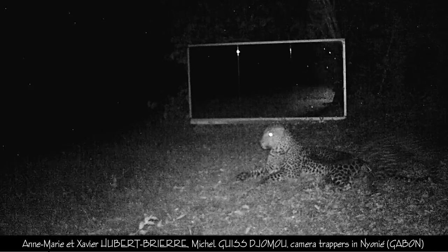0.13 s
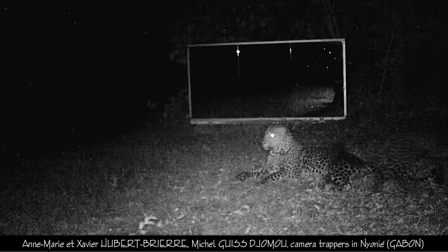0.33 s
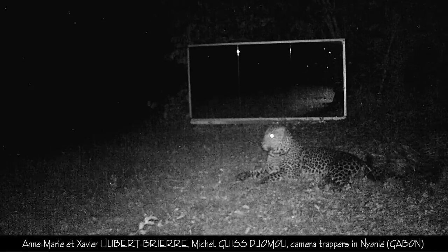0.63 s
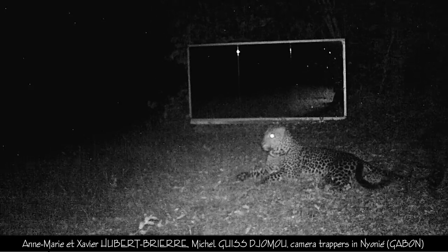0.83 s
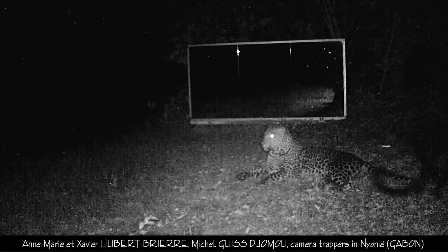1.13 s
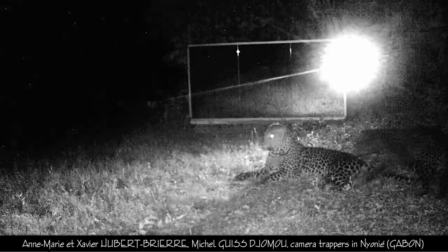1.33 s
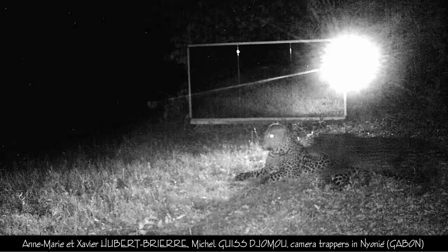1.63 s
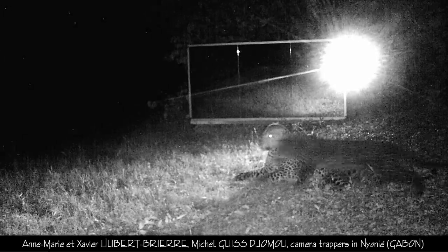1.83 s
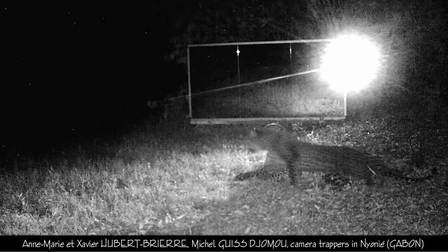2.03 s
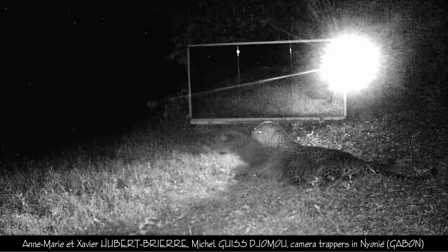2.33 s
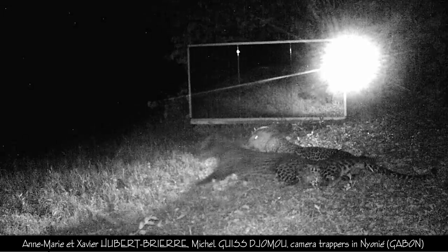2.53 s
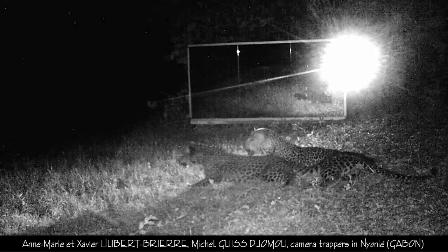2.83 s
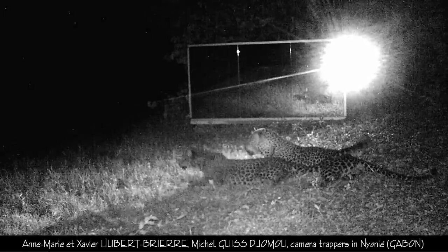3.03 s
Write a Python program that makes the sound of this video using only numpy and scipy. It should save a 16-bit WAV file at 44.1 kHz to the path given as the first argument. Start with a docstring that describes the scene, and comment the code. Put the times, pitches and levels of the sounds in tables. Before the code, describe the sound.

Leopard growls pulse low and rattly, faint until 0.7 s, more open from 0.8 to 1.35, then deep and swelling from 1.5 to 2.2. A rasping snarl bursts around 2.45, followed by a protesting growl and hard jaw snap at 2.7, then a quiet rumble after 2.9. Twigs crack near 0.3, 1.2 and 1.8 amid leaf rustles. Crickets shimmer throughout; the small camera sounds grainy, faintly doubled.

```python
"""Forest at night: two leopards meet among singing insects, paws stirring dry leaves and snapping twigs.
Slow throat pulses ring mouth and throat resonances: growls alternate deep and more open, break into a
rasping snarl and a snap of the jaws, then sink back. Insects are dense random ticks in narrow bands.
A small trail camera doubles everything faintly and, by its low sample rate, mirrors the insects into the treble."""
import sys
import numpy as np
from scipy import signal
from scipy.fft import rfft, irfft, next_fast_len
from scipy.io import wavfile
from scipy.ndimage import uniform_filter1d

SR = 44100
rng = np.random.default_rng(int(sys.argv[2]) if len(sys.argv) > 2 else 0)


def unload_wav(signal):
    """Save mono or channel-first audio to the path in sys.argv[1] as 16-bit WAV at rate SR, clipped to [-1, 1]."""
    wavfile.write(
        sys.argv[1],
        SR,
        np.round(np.clip(np.atleast_2d(signal).T, -1, 1) * 32767).astype(np.int16),
    )


N = 141120


def amp(db):
    """Decibels to gain."""
    return 10 ** (np.asarray(db) / 20)


def unit(x):
    """Scale to rms 1."""
    return x / np.sqrt(np.mean(x ** 2) + 1e-20)


def clock():
    """Time of every sample, in s."""
    return np.arange(N) / SR


def curves(rows):
    """Straight-line curve over time for each column after the first."""
    time_s, *columns = np.transpose(rows)
    return [np.interp(clock(), time_s, column) for column in columns]


def bump(centre_s, half_s):
    """Gaussian rise and fall; half_s is its standard deviation."""
    return np.exp(-.5 * ((clock() - centre_s) / half_s) ** 2)


def filtered(x, response):
    """x times a (complex) response of frequency, zero-padded."""
    m = next_fast_len(N + SR // 2)
    return irfft(rfft(x, m) * response(np.fft.rfftfreq(m, 1 / SR)), m)[:N]


def coloured(x, points):
    """x shaped by (freq_hz, level_db) points on a log frequency axis, at rms 1."""
    freq_hz, level_db = np.transpose(points)
    return unit(filtered(x, lambda f: amp(np.interp(np.log(f + 1), np.log(freq_hz), level_db))))


def causal(gain):
    """Minimum-phase response with this gain, by folding the cepstrum."""
    c = irfft(np.log(gain + 1e-6))
    half = len(c) // 2
    folded = np.r_[c[0], 2 * c[1:half], c[half], np.zeros(half - 1)]
    return np.exp(rfft(folded))


def ticks(rate_per_s):
    """Single-sample impulses of random size at random times."""
    hits = rng.random(N) < rate_per_s / SR
    return hits * rng.standard_normal(N)


# night air and microphone floor: freq_hz, level_db (relative)
AIR_TONE = [(15, 7.5), (55, -7.5), (100, -5), (300, -16), (600, -20.5), (1000, -21), (1400, -16),
            (1700, -19.5), (2800, -9.5), (3600, -27), (5500, -29)]
AIR_DB = -43.5


def night_air():
    """Steady shaped noise."""
    return amp(AIR_DB) * coloured(rng.standard_normal(N), AIR_TONE)


# cricket chorus level: time_s, level_db
CHORUS = [(0, -30), (.5, -28), (.63, -33), (.76, -30.5), (1.42, -30.5), (1.66, -27.5), (1.77, -32.5),
          (1.95, -28), (2.17, -26.5), (2.27, -31), (2.4, -27.5), (2.65, -26), (2.83, -25), (2.95, -32),
          (3.2, -32.5)]
# cricket chorus spectrum: freq_hz, level_db (relative)
CHORUS_TONE = [(1650, -47), (2020, -32), (2130, -14), (2260, -10), (2370, 0), (2480, -7), (2570, -17),
               (2700, -49), (3100, -46)]
# swells of the higher crickets: centre_s, half_s, level_db
SWELLS = [(0.165, 0.053, -31), (0.263, 0.059, -41.5), (0.495, 0.049, -34), (0.779, 0.039, -29.5),
          (0.998, 0.037, -33.5), (1.268, 0.041, -31), (2.057, 0.035, -32), (2.402, 0.048, -29.5),
          (2.589, 0.04, -28.5), (2.803, 0.062, -35), (2.914, 0.023, -38), (3.104, 0.064, -39)]
# higher cricket spectrum: freq_hz, level_db (relative)
SWELL_TONE = [(2400, -63), (2650, -13), (2810, -6), (2920, 3), (3000, -8.5), (3080, -9), (3220, -26),
              (3500, -68)]
# thin buzz level: time_s, level_db
BUZZ = [(0, -88), (.45, -58.5), (.65, -43), (1, -35), (1.25, -43), (1.5, -39.5), (1.7, -46.5),
        (2.95, -68.5), (3.2, -43.5)]
# thin buzz spectrum: freq_hz, level_db (relative)
BUZZ_TONE = [(3500, -62), (4400, -16.5), (4900, -5), (5500, -4.5)]
SWELL_REST_DB = -40.5
STROKES_PER_S = 6000


def insects():
    """Countless overlapping wing strokes in two pitch bands, a thin buzz above them."""
    chorus = amp(curves(CHORUS)[0]) * coloured(ticks(STROKES_PER_S), CHORUS_TONE)
    swell = amp(SWELL_REST_DB) + sum(amp(db) * bump(s, half_s) for s, half_s, db in SWELLS)
    higher = swell * coloured(ticks(STROKES_PER_S), SWELL_TONE)
    buzz = amp(curves(BUZZ)[0]) * coloured(ticks(4000), BUZZ_TONE)
    return chorus + higher + buzz


JITTER_CYCLES = 0.0509  # scatter of the throat pulses
SKIRT, LEAK_DB = 2.45, -29.5  # steepness of the resonances; what passes between them
BRIGHT_HZ, BRIGHT_DB_PER_DB = 626, 0.24  # above BRIGHT_HZ, extra dB per dB of effort


def throat_source(rows, rough, burst_s, air_db):
    """Slaps of the vocal folds, each releasing a dying puff of turbulence, over steady breath."""
    t, start_s, end_s = clock(), rows[0][0], rows[-1][0]
    rate_per_s, level_db = curves(rows)
    voiced = (t >= start_s) & (t < end_s)
    cycles = np.cumsum(rate_per_s * voiced) / SR
    whole = np.arange(cycles[-1])
    scattered = whole + JITTER_CYCLES * rng.standard_normal(256)[:len(whole)]
    at = np.searchsorted(cycles, np.clip(scattered, 1e-9, cycles[-1]))
    slaps = np.zeros(N)
    # even power at any rate; each slap varies by about 1 dB
    slaps[at] = np.sqrt(SR / rate_per_s[at]) * amp(rng.standard_normal(256)[:len(at)])
    puff = np.exp(-t[:SR // 8] / burst_s)
    puffs = signal.fftconvolve(slaps, puff / np.linalg.norm(puff))[:N]
    breath = amp(air_db) * uniform_filter1d(voiced * 1., size=600)
    share = np.clip(rough, 0, 1)
    turbulence = (np.sqrt(share) * puffs + breath) * rng.standard_normal(N)
    return amp(level_db) * (np.sqrt(1 - share) * slaps + turbulence), level_db


def growl(rows, throat, rough, burst_s, air_db, bright=BRIGHT_DB_PER_DB):
    """Slaps and turbulence ring the throat, brighter with more effort."""
    source, level_db = throat_source(rows, rough, burst_s, air_db)

    def tract(f):
        """Resonances in parallel, at rms gain 1."""
        peaks = sum(amp(db) / (1 + abs(2 * (f - hz) / width_hz) ** SKIRT) for hz, width_hz, db in throat)
        leak = amp(LEAK_DB) / (1 + (f / BRIGHT_HZ) ** 2)
        return causal(unit(peaks + leak))

    voice = filtered(source, tract)
    low = filtered(voice, lambda f: 1 / (1 + (f / BRIGHT_HZ) ** 8))
    return low + (voice - low) * amp(bright * (level_db - level_db.max()))


# lips part and close in the deep growls: time_s, resonance_hz, boost_db
MOUTH = [(1.54, 438, 9), (1.65, 706, 13.5), (1.77, 700, 15.5), (1.85, 697, -5), (2.95, 735, 27),
         (3.1, 480, 8.5)]
MOUTH_WIDTH_HZ = 47


def mouth(x):
    """Moving resonance of the parted lips: shift to 0 Hz, one-pole smooth, shift back."""
    resonance_hz, boost_db = curves(MOUTH)
    turn = np.exp(2j * np.pi * np.cumsum(resonance_hz) / SR)
    pole = np.exp(-np.pi * MOUTH_WIDTH_HZ / SR)
    smoothed = signal.lfilter([1 - pole], [1, -pole], x / turn)
    return amp(boost_db) * 2 * np.real(turn * smoothed)


# growls: time_s, pulses_per_s, level_db
FADING = [(.018, 24, -44), (.07, 20, -44), (.14, 13.7, -60.5), (.25, 19, -50), (.66, 19.2, -56.5)]
WARNING = [(.826, 27.3, -38.5), (.95, 20, -37.5), (1.12, 23, -33), (1.2, 19, -33.5), (1.352, 18.1, -41)]
APPROACH = [(1.475, 24.76, -44), (1.639, 24.66, -30.5), (1.719, 27.12, -34), (1.792, 24.81, -31.5),
            (1.839, 32.91, -36), (1.95, 35.08, -32), (2.05, 29.97, -34.5), (2.189, 29.76, -27.5),
            (2.235, 27.9, -41)]
SNARL = [(2.317, 55.32, -29.5), (2.355, 52.4, -26.5), (2.4, 47.95, -26.5), (2.437, 49.55, -15),
         (2.465, 46.65, -19), (2.522, 44.4, -22.5), (2.545, 43.1, -29.5), (2.6, 42.04, -32.5)]
PROTEST = [(2.574, 45.86, -31), (2.598, 27.04, -26.5), (2.67, 25.02, -31), (2.735, 34, -26.5),
           (2.78, 23.8, -30), (2.82, 23.6, -37)]
SETTLING = [(2.928, 36.4, -41.5), (3.016, 33.13, -38.5), (3.074, 34.94, -37.5), (3.2, 27.76, -43)]
# throat and mouth resonances: freq_hz, width_hz, level_db (relative)
DEEP = [(98.8, 140, -17), (203, 63.4, 0.5), (510, 290, -37.5), (1883, 115, -15.5)]
OPEN = [(109, 140, -10), (211.6, 51, -5.5), (378, 79, 0), (879, 143, -21), (1863, 174, -18.5)]
TENSE = [(122, 62, -2.5), (203.7, 61, 7), (374, 90, 0.5), (875, 43, -10.5), (1110, 2800, -24),
         (2010, 150, -4)]
BARED = [(219, 98, 2.5), (553, 200, -14.5), (1014, 206, -5.5), (1302, 440, -12), (1788, 60, 3),
         (1892, 86, 2), (2236, 300, 4.5), (3960, 1950, -24)]
# gapes in the open growls, lifting their upper resonance: centre_s, half_s, boost_db
YAWNS = [(1.094, 0.091, 13), (2.737, 0.021, 13.5)]
YAWN_HZ, YAWN_WIDTH_HZ = 891, 154


def leopards():
    """Deep growls alternate with open ones; the snarl is a coarse rattle of hissing puffs."""
    deep = sum(growl(rows, DEEP, rough=.2, burst_s=.008, air_db=-7) for rows in (FADING, APPROACH, SETTLING))
    warning = growl(WARNING, OPEN, rough=.22, burst_s=.011, air_db=-6)
    protest = growl(PROTEST, TENSE, rough=.35, burst_s=.012, air_db=0)
    snarl = growl(SNARL, BARED, rough=.8, burst_s=.0056, air_db=-10, bright=0)
    wide = warning + protest
    gape = sum(amp(db) * bump(s, half_s) for s, half_s, db in YAWNS)
    upper = filtered(wide, lambda f: causal(1 / (1 + (2 * (f - YAWN_HZ) / YAWN_WIDTH_HZ) ** 2)))
    return deep + mouth(deep) + wide + gape * upper + snarl


# paws and tails in dry leaves: centre_s, half_s, level_db, crispness_db
RUSTLES = [(0.117, 0.028, -45, 5), (0.307, 0.016, -36, -10), (0.771, .02, -38.5, -2.5),
           (1.361, 0.011, -39.5, -11.5), (1.445, 0.074, -43, -15), (1.725, 0.031, -50, 8.5),
           (1.839, 0.022, -38, -11), (2.054, 0.028, -36, 1.5), (2.151, 0.055, -35.5, -12)]
# dull crunch spectrum: freq_hz, level_db (relative)
LEAF_BODY = [(300, -57), (750, -41), (1100, -8.5), (1450, -1.5), (1650, -11), (2000, -2), (3000, -14),
             (5500, -20)]
# fine crackle spectrum: freq_hz, level_db (relative)
LEAF_CRISP = [(1000, -13), (2500, -11.5), (4000, -6.5), (5500, -9.5)]


def leaves():
    """Each stir presses a dull crunch and finer crackles out of the litter."""
    body = sum(amp(db) * bump(s, half_s) for s, half_s, db, crisp_db in RUSTLES)
    edge = sum(amp(db + crisp_db) * bump(s, half_s) for s, half_s, db, crisp_db in RUSTLES)
    crunch = body * coloured(ticks(2500), LEAF_BODY)
    crackle = edge * coloured(ticks(1500), LEAF_CRISP)
    return crunch + crackle


def clacks(events, modes, crack_db, crack_s, top_hz):
    """Hard contacts: abrupt noise crack plus fast modes; pitch ratio scales modes and top_hz."""
    out, t = np.zeros(N + SR), np.arange(SR // 4) / SR
    for start_s, level_db, pitch in events:
        ring = sum(amp(db - 60 * t / t60_s) * np.sin(2 * np.pi * pitch * hz * t) for hz, db, t60_s in modes)
        crack = amp(crack_db - 60 * t / crack_s) * rng.standard_normal(len(t))
        soften = signal.butter(6, pitch * top_hz, fs=SR, output="sos")
        out[round(start_s * SR):][:len(t)] += amp(level_db) * signal.sosfilt(soften, ring + crack)
    return out[:N]


# dry twigs cracking underfoot: start_s, level_db, pitch_ratio
TWIGS = [(.3005, -17, 1), (1.1777, -18.5, 1.55), (1.801, -26, 1.6)]
# twig modes at pitch ratio 1: freq_hz, level_db (relative), t60_s
TWIG = [(1223, -6.5, 0.019), (1463, 0.5, 0.024), (1844, -11.5, 0.019)]
TWIG_LOW_HZ = 940


def twigs():
    """Dry wood snaps: short modes and a crack, thinned below TWIG_LOW_HZ."""
    snaps = clacks(TWIGS, TWIG, crack_db=3, crack_s=0.018, top_hz=2600)
    return filtered(snaps, lambda f: 1 - 1 / (1 + (f / TWIG_LOW_HZ) ** 6))


# snaps of the jaws: start_s, level_db, pitch_ratio
SNAPS = [(2.7125, -7, 1), (2.7353, -16.5, 1.1)]
# jaw modes at pitch ratio 1: freq_hz, level_db (relative), t60_s
JAWS = [(366, -20, 0.09), (875, -17, 0.11), (2190, 2.5, 0.048), (2920, -4, 0.01)]


def jaws():
    """Teeth and jaw bones meet: a crack and a few damped modes."""
    return clacks(SNAPS, JAWS, crack_db=-1, crack_s=0.016, top_hz=3300)


def scene():
    """Night air, insects, cats, leaf litter, twigs and jaws."""
    return (night_air() + insects() + leopards() + leaves() + twigs() + jaws())[None]


DOUBLE_LEAD_S, DOUBLE_DB = .017415, -9.5
CAMERA_HZ, TOP_HZ = 11025, 17100  # sample rate; upper limit of the output


def record(dry):
    """A weak copy runs just ahead; coarse samples joined by straight lines mirror the sound into the treble."""
    def double(f):
        """Direct sound plus advanced copy, cut at half the camera's sample rate."""
        ahead = amp(DOUBLE_DB) * np.exp(2j * np.pi * f * DOUBLE_LEAD_S)
        return (1 + ahead) * (f < CAMERA_HZ / 2)

    doubled = filtered(dry[0], double)
    step = SR // CAMERA_HZ
    coarse = np.interp(clock(), clock()[::step], doubled[::step])
    return filtered(coarse, lambda f: f < TOP_HZ)[None]


dry = scene()
out = record(dry)
unload_wav(out)
```